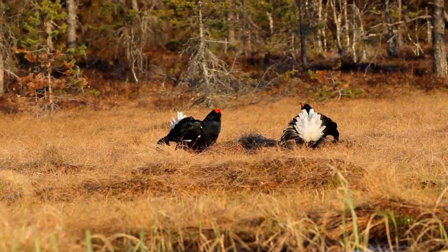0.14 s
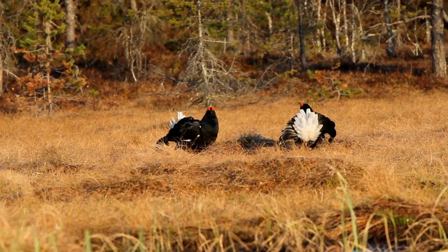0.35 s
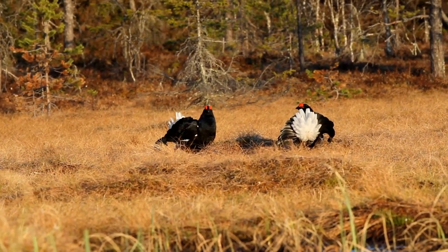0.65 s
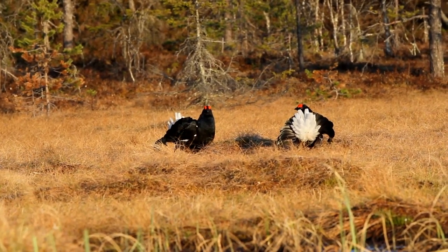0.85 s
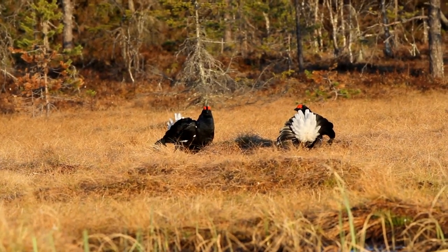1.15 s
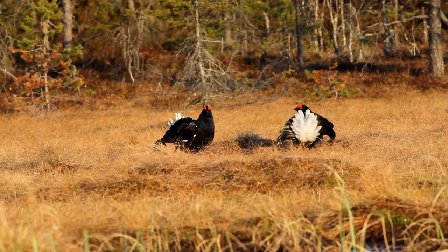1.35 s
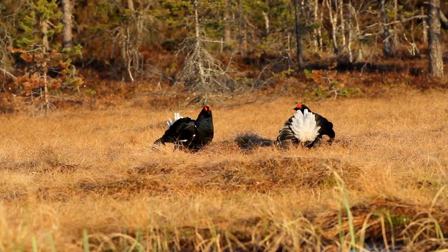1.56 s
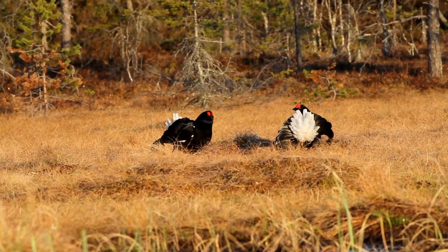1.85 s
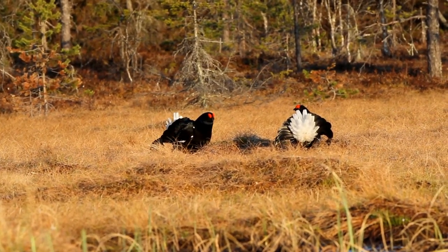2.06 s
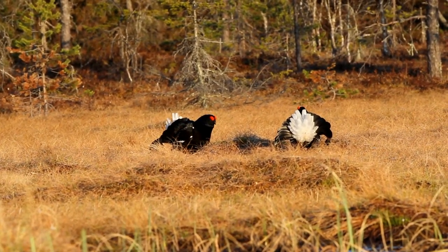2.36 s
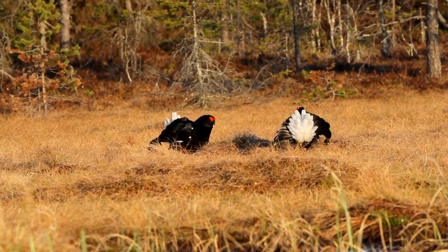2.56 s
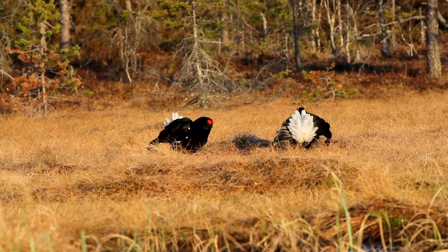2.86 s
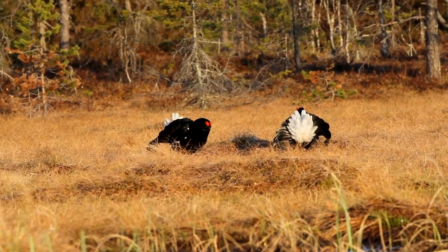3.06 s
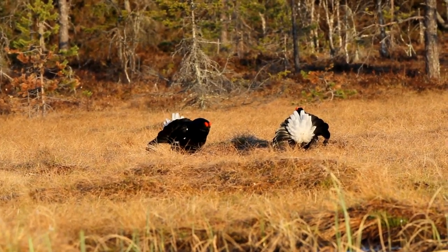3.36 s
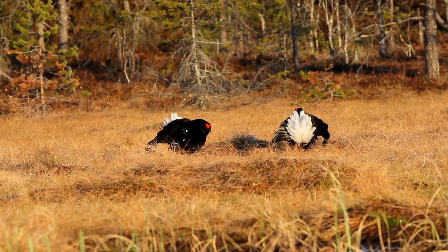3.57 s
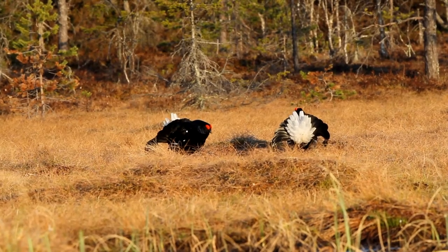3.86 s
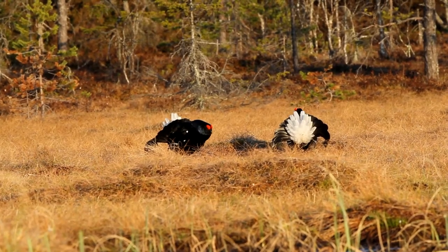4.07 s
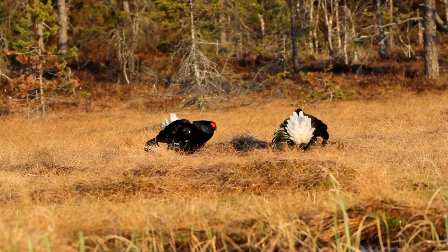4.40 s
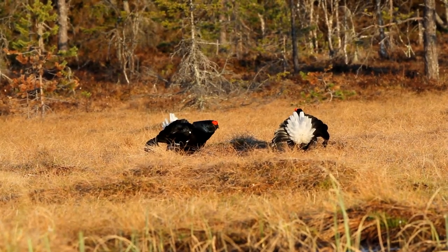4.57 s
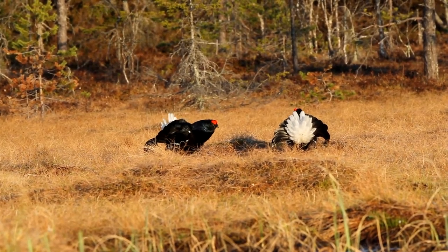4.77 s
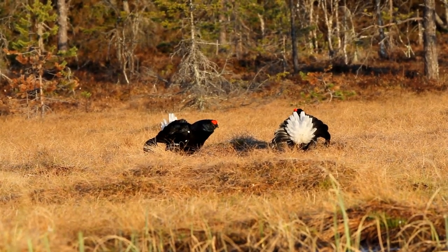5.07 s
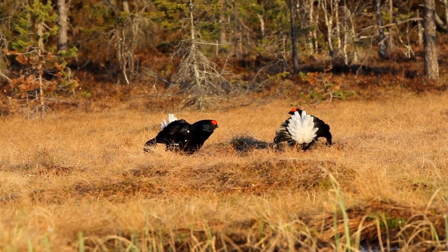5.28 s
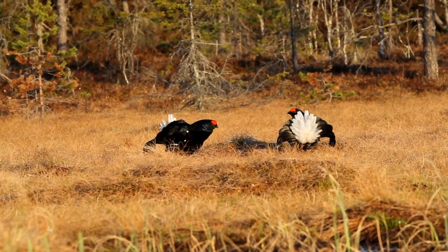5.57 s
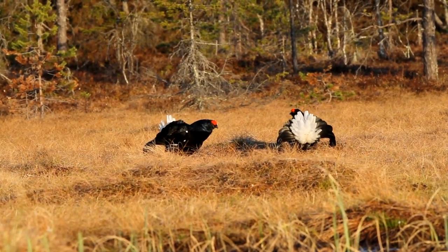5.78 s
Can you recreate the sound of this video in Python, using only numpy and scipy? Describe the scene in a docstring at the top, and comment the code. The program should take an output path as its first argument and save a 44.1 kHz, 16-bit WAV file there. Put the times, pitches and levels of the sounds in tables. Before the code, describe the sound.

Rapid low bubbling of displaying grouse comes in bursts with a lull between, with light wind rumble, faint far birds and a few close snaps.

```python
"""An open bog by a forest edge: black grouse cocks bubble, gliding near-pure sine coos rung by their throat sacs.
More cocks murmur far off, built from many overlapping notes, and the forest returns a faint noise-built echo.
A small songbird chirps and far birds whistle and call, as swept sines and narrow noise; filtered pulses
tick close by. Light wind rumbles under the hiss, both shaped noise, on a nearly mono pair of microphones."""
import sys
import numpy as np
from scipy import signal
from scipy.fft import rfft, irfft
from scipy.io import wavfile

SR = 44100
rng = np.random.default_rng(int(sys.argv[2]) if len(sys.argv) > 2 else 0)


def to_wav(s):
    """Save 16-bit WAV."""
    ch = np.atleast_2d(s).T  # columns
    pcm = np.round(np.clip(ch, -1, 1) * 32767)  # PCM
    wavfile.write(sys.argv[1], SR, pcm.astype(np.int16))


N = 261954
T = np.arange(N) / SR  # time, s
HZ = np.arange(N // 2 + 1) * SR / N + 1e-6  # frequency of each spectrum bin; the offset keeps it above zero


def undb(db):
    """Decibels to gain."""
    return 10 ** (np.asarray(db) / 20)


def curve(rows):
    """Join (s, value) rows by straight lines."""
    return np.interp(T, *np.transpose(rows))


def add(out, start, sound):
    """Mix a sound in at a time in seconds; it may already be under way at time zero."""
    i = int(min(start * SR, N - 1))
    part = sound[max(-i, 0):N - i]
    first = max(i, 0)
    out[first:first + len(part)] += part


def noise(gain):
    """Noise of rms 1 with a given gain at each frequency."""
    x = irfft(rfft(rng.standard_normal(N)) * gain, N)
    return x / x.std()


def colour(points):
    """Gain at each frequency from (Hz, dB) points, joined along a logarithmic frequency scale."""
    hz, db = np.transpose(points)
    return undb(np.interp(np.log(HZ), np.log(hz), db))


def resonance(hz, width_hz):
    """Response of one resonance, 1 at its centre."""
    return 1 / (1 + 1j * (HZ / hz - hz / HZ) * hz / width_hz)


def walk(rate):
    """Slow random wandering of rms 1, mostly below the given rate in Hz."""
    return noise(np.exp(-(HZ / rate) ** 2) * (HZ > rate / 20))


def forest(x, t60, delay):
    """Echo scattered back by many trunks: it builds up over the delay, then falls 60 dB in t60 (both s)."""
    t = T[:SR]
    build_up = 1 - np.exp(-(t / delay) ** 2)
    tail = rng.standard_normal(SR) * undb(-60 * t / t60) * build_up
    return signal.fftconvolve(x, tail / np.linalg.norm(tail))[:N]


def coo(length, first_hz, middle_hz, last_hz, crest, waver=0.0049, sag=0.15, sag_time=0.016, steepness=0.73):
    """One note: a sine that bends through three pitches, swells and fades, and sags as the pressure is let go."""
    u = np.linspace(0, 1, max(int(length * SR), 64))  # position in the note, 0-1
    hz = first_hz * (1 - u) * (1 - 2 * u) + middle_hz * (2 * u) * (2 - 2 * u) + last_hz * u * (2 * u - 1)
    hz = hz * (1 - sag * np.exp(-((1 - u) * length / sag_time) ** 2))
    hz = hz * (1 + waver * np.interp(u, np.linspace(0, 1, 8), rng.standard_normal(size=8)))
    phase = 2 * np.pi * (np.cumsum(hz) / SR + rng.random())
    rise_and_fall = np.interp(u, [0, np.clip(crest, .1, .9), 1], [0, 1, 0])
    swell = np.sin(np.pi / 2 * rise_and_fall) ** steepness
    return swell * np.sin(phase)


def arched(length, hz, glide, arch, crest):
    """A coo whose pitch slides by its glide and whose ends lie under mid-note by its arch (shares of the pitch)."""
    return coo(length, hz * (1 - glide - arch), hz, hz * (1 + glide - arch), crest)


def grouse():
    """Coos leap out and ring briefly where their pitch sweeps through the resonances of the inflated sac."""
    # single coos, levels ahead of the sac: start/s, length/s, mid-note f/Hz, glide from mid-note to end/share
    # of pitch, level/dB
    coos = [(-0.03, 0.072, 645.0, 0.00028, -41.0), (0.018, 0.11, 638, 0.0075, -47),
            (0.067, 0.03, 600, 0.026, -44.5), (0.113, 0.075, 484.4, 0.011, -45),
            (0.195, 0.052, 553, 0.16, -45), (0.242, 0.031, 620, 0.17, -47.5),
            (0.302, 0.057, 690.0, 0.13, -42.5), (0.336, 0.038, 578, 0.11, -41.0),
            (0.391, 0.072, 568, -0.097, -55.5), (0.473, 0.056, 608, 0.073, -52.5),
            (0.478, 0.024, 483, 0.07, -47.5), (0.535, 0.07, 591, 0.1, -45.0),
            (0.577, 0.028, 490.0, -0.093, -47), (0.607, 0.058, 662, 0.059, -41.5),
            (0.723, 0.056, 561, -0.045, -41.5), (0.801, 0.047, 558, 0.15, -43.5),
            (0.85, 0.032, 575, 0.099, -44), (0.871, 0.064, 596.5, -0.25, -43),
            (1.095, 0.063, 544, -0.26, -51), (1.132, 0.097, 417, -0.12, -49),
            (1.237, 0.048, 428, 0.034, -46.5), (1.308, 0.064, 440, 0.023, -45.3),
            (1.379, 0.063, 445.0, -0.17, -47.5), (1.451, 0.053, 450, 0.076, -46),
            (1.615, 0.045, 630, 0.03, -61.5), (1.682, 0.057, 429, 0.1, -52.0),
            (1.732, 0.07, 451, -0.03, -45.5), (1.755, 0.118, 434, -0.07, -47.5),
            (1.862, 0.053, 447, 0.042, -43.5), (2.833, 0.04, 385, 0.0033, -49),
            (2.862, 0.069, 415, -0.071, -51.5), (2.924, 0.047, 648, 0.067, -42.5),
            (2.937, 0.068, 393, -0.079, -47.5), (2.993, 0.046, 671, 0.044, -42.5),
            (3.06, 0.026, 670, 0.13, -49.5), (3.08, 0.048, 401, -0.064, -50.5),
            (3.248, 0.11, 622, 0.063, -47), (3.403, 0.03, 679, 0.2, -40),
            (3.536, 0.038, 650.0, 0.12, -46.5), (3.701, 0.05, 659, 0.089, -43.5),
            (3.714, 0.149, 626.5, -0.01, -48.5), (4.034, 0.044, 694, 0.071, -42),
            (4.126, 0.055, 523, -0.21, -43), (4.199, 0.06, 541, -0.124, -40),
            (4.265, 0.063, 578, -0.085, -39), (4.333, 0.062, 625.0, -0.076, -36),
            (4.414, 0.025, 659, -0.012, -35.5), (4.467, 0.029, 663, 0.038, -35),
            (4.655, 0.052, 578, -0.014, -52.5), (4.69, 0.086, 614, -0.07, -38.1),
            (4.826, 0.028, 672, -0.0092, -39.5), (4.943, 0.059, 594.0, 0.14, -40),
            (5.026, 0.07, 498.7, -0.086, -43), (5.104, 0.065, 605, 0.19, -40),
            (5.135, 0.026, 587, -0.12, -45.0), (5.137, 0.082, 637, 0.062, -48.5),
            (5.224, 0.028, 634, 0.03, -34.9), (5.337, 0.023, 621, -0.12, -44.5),
            (5.364, 0.05, 514.0, 0.068, -45.5), (5.425, 0.023, 660.0, 0.21, -40),
            (5.449, 0.024, 651, 0.04, -39.5), (5.507, 0.025, 646, -0.062, -42),
            (5.585, 0.066, 569.0, -0.082, -40.5), (5.672, 0.054, 538.4, -0.016, -40.0),
            (5.723, 0.07, 606, -0.14, -39.5)]
    # resonances of throat and inflated sac, in opposite phase: f/Hz, width/Hz, gain/factor
    sac = [(514, 25, 3), (599.2, 33.8, -3)]
    arch, crest = 0.092, 0.56  # crest: loudest point of a coo, 0-1
    tail_s, tail_hz, tail_db = .028, 398, -12.5  # short downward slide after a falling coo; dB against the coo
    tail_from_hz = 480  # lower coos have no room left to slide
    throb_db, throb_hz = 1.5, 40  # the air pressure in the sac trembles within each note

    voice = roll()
    tail = coo(tail_s, tail_hz * 1.245, tail_hz, tail_hz * 1.14, 0.52)
    for start, length, hz, glide, db in coos:
        add(voice, start, undb(db) * arched(length, hz, glide, arch, crest))
        if glide < 0 and hz > tail_from_hz:
            add(voice, start + length - tail_s / 4, undb(db + tail_db) * tail)
    body = 1 + sum(gain * resonance(hz, width_hz) for hz, width_hz, gain in sac)
    trembling = voice * undb(throb_db * walk(rate=throb_hz))
    return irfft(rfft(trembling) * body, N)


def far_lek(low_hz=390, high_hz=610, fall=0.12, length=0.0554, count=260):
    """Many distant cocks: falling coos that overlap and blur, with their echo, into a murmur."""
    # the far cocks together: t/s, level/dB
    murmur_level = [(0, -55), (.9, -59), (1.1, -61.5), (1.65, -60.5), (2.0, -86), (2.15, -59), (2.5, -67),
                    (2.7, -60), (3.6, -56), (4.2, -56), (4.9, -61.5), (5.3, -56), (5.94, -63)]
    voice = np.zeros(N)
    for k, (when, pitch, size) in enumerate(rng.random((count, 3))):
        hz = low_hz + (high_hz - low_hz) * pitch ** 1.5  # the lower pitches are commoner
        start = (k + when) / count * N / SR
        note = coo(length, hz * (1 + fall / 2), hz, hz * (1 - 2 * fall), 0.16)
        add(voice, start, undb(5.8 * size) * note)
    voice = voice + undb(2.0) * forest(voice, t60=1.0, delay=0.035)
    return voice / voice.std() * undb(curve(murmur_level))


def wind(flutter_db=3.0):
    """The breeze rumbles on the microphone and flutters in quick eddies."""
    # strength of the breeze on the microphone, ahead of the flutter: t/s, level/dB
    breeze = [(0, -65.5), (.35, -53.5), (.6, -65), (1.1, -57.5), (1.55, -79), (2.45, -74.5), (2.7, -57.5),
              (3.05, -69.5), (3.35, -63), (3.9, -69.5), (4.5, -72.5), (5.0, -63.5), (5.3, -61),
              (5.75, -64.5), (5.94, -59)]
    # spectrum of the rumble: f/Hz, relative level/dB
    rumble = [(20, -4.5), (40, -2), (65, 3), (100, -2), (160, -9.5), (300, -41), (700, -37)]
    return noise(colour(rumble)) * undb(curve(breeze) + flutter_db * walk(rate=8))


def hiss(side_db=-22):
    """Even hiss, nearly the same in both ears; only the treble has a trace of width."""
    # spectrum of steady air and hiss: f/Hz, relative level/dB
    air = [(30, -7.5), (120, 4.5), (230, 5.5), (400, 1), (800, -1.5), (1100, -4.5), (2500, -6),
           (4000, -6.5), (6000, -7.5), (9000, -10), (13000, -11.5), (15500, -10.5)]
    # narrow bands that stand out of the hiss: f/Hz, width/Hz, level/dB
    bands = [(8290, 160, -76)]
    air_db = -57
    mid = undb(air_db) * noise(colour(air))
    for hz, width_hz, db in bands:
        mid = mid + undb(db) * noise(resonance(hz, width_hz))
    side = undb(air_db + side_db) * noise(colour(air) * (HZ > 4500))
    return np.array([mid + side, mid - side])


def ticks():
    """Small dry snaps close by: a sharp pulse, a brief crackle, a dead woody body and a dull knock under it."""
    # close ticks: t/s, level/dB, crackle decay/s, upper edge f/Hz, low knock/dB, woody body/dB
    snaps = [(.0438, -34, .002, 3900, 2, 0), (.195, -36, .0005, 7500, -9, -8),
             (1.061, -44, .0015, 3200, 7, -2), (1.432, -46, .0015, 4000, 3, -2),
             (2.208, -46, .001, 4500, 2, -2), (3.204, -34, .0012, 10000, -20, -22),
             (3.399, -55, .002, 5000, 1, -8), (3.724, -52, .001, 7000, -1, -6)]
    out, t = np.zeros(N), T[:SR // 20]
    knock = np.sin(2 * np.pi * 180 * t) * np.exp(-t / .003)
    wood = signal.butter(2, [450, 1150], "bandpass", fs=SR, output="sos")
    for start, db, decay, edge_hz, knock_db, body_db in snaps:
        crackle = .35 * rng.standard_normal(len(t)) * np.exp(-t / decay)
        snap = 2 * (t == 0) + crackle
        snap = snap * np.sqrt(SR / 2 / edge_hz)  # a duller snap is driven harder into its filter
        body = signal.sosfilt(wood, rng.standard_normal(len(t)) * np.exp(-t / .003))
        body = body / abs(body).max()
        tick = snap + undb(knock_db) * knock + undb(body_db) * body
        edge = signal.butter(10, edge_hz, fs=SR, output="sos")
        add(out, start, undb(db) * signal.sosfilt(edge, tick))
    return out


def songbird():
    """The same quick two-part chirp, a sine of slightly different pitch each time, with a faint echo."""
    # songbird chirps: t/s, level/dB, extra level of the upward flick/dB
    chirps = [(1.304, -58, 5), (1.582, -58, 3), (2.295, -54.5, 0.5), (3.692, -57, -4), (4.566, -54.5, 2.5),
              (5.685, -52.5, 7.5), (5.916, -48, 8)]
    # one chirp, an arch and an upward flick: t/s from its start, f/Hz, level/dB
    shape = [(0, 2820, -2), (.005, 3580, -1.5), (.011, 3804, -4.5), (0.017, 3603, 3.5), (.023, 2776, -1),
             (.0265, 2164, -3.5), (.031, 4050, -5), (.037, 4650, 0), (0.045, 5340, -13)]
    out = np.zeros(N)
    s, hz, db = np.transpose(shape)
    t = T[T < s[-1]]
    swell = undb(np.interp(t, s, db)) * signal.windows.tukey(len(t), .1)
    flick = np.interp(t, s, s > s[np.argmin(hz)])  # all that follows the lowest pitch
    for start, level_db, flick_db in chirps:
        pitch = np.interp(t, s, hz) * (1 + 0.0111 * rng.standard_normal())
        tone = np.sin(2 * np.pi * np.cumsum(pitch) / SR)
        add(out, start, undb(level_db + flick_db * flick) * swell * tone)
    return out + undb(-9.5) * forest(out, t60=0.19, delay=0.0038)


def whistler(low_hz=1880, rise_hz=620, length=0.12):
    """Thin upward whistles from the forest edge: one rising sine that swells and fades."""
    # faint rising whistles of a distant bird: t/s, level/dB
    whistles = [(1.46, -71), (1.94, -68), (2.27, -66), (2.61, -66)]
    out, u = np.zeros(N), np.linspace(0, 1, int(length * SR))
    pitch = low_hz + rise_hz * u ** 1.5
    whistle = np.sin(np.pi * u) * np.sin(2 * np.pi * np.cumsum(pitch) / SR)
    for start, db in whistles:
        add(out, start, undb(db) * whistle)
    return out + undb(-24) * forest(out, t60=1.0, delay=0.026)


def far_bird():
    """Drawn-out distant calls, blurred by the forest: narrow noise, a wavering tone that swells and fades."""
    # a far bird's calls: t/s of the loudest moment, level/dB
    calls = [(2.52, -69.5), (4.6, -71.5), (5.85, -64.5)]
    rise_s, fall_s = 0.34, 0.26
    swell = np.zeros(N)
    for peak_s, db in calls:
        spread_s = np.where(T < peak_s, rise_s, fall_s)
        swell += undb(db) * np.exp(-((T - peak_s) / spread_s) ** 2)
    return noise(resonance(hz=1312, width_hz=130) ** 2) * swell


def roll(scatter_db=4.5, scatter=0.022):
    """A cock bubbles on evenly, about fifteen falling notes a second, each a little different."""
    start_s, end_s, period_s = 3.324, 4.09, .0665
    note_s, note_hz, note_db = .074, 443.2, -49  # pitch and level ahead of the scatter and the sac
    glide, arch = -0.18, -0.069  # shares of the pitch: a steep fall that flattens out
    crest = 0.67  # loudest point of a note, 0-1
    out = np.zeros(N)
    starts = np.arange(start_s, end_s, period_s)
    for start, (size, pitch) in zip(starts, rng.standard_normal((len(starts), 2))):
        note = arched(note_s, note_hz * (1 + scatter * pitch), glide, arch, crest)
        add(out, start, undb(note_db + scatter_db * size) * note)
    return out


def scene():
    """The cocks and their echo, the other birds, the ticks and the background."""
    cocks = grouse()
    echo = undb(-21) * forest(cocks, t60=.9, delay=0.02)
    birds = cocks + echo + far_lek() + songbird() + whistler() + far_bird()
    return birds + ticks() + wind() + hiss()


def record(dry):
    """The recorder cuts the top steeply above 15.6 kHz."""
    return signal.sosfilt(signal.ellip(10, .2, 70, 15600, fs=SR, output="sos"), dry)


dry = scene()
out = record(dry)
to_wav(out)
```